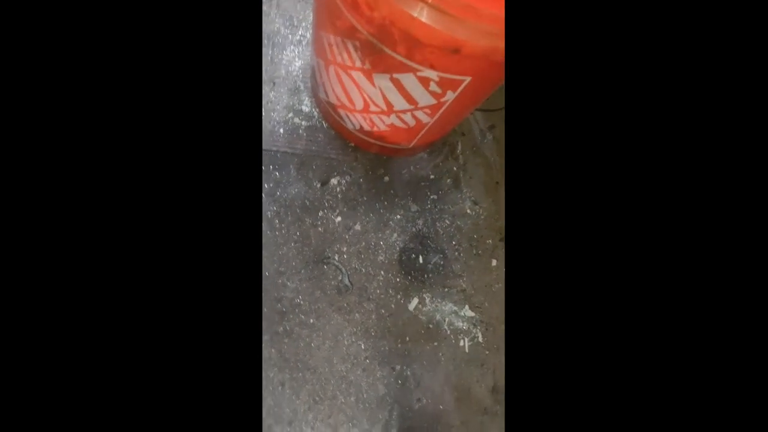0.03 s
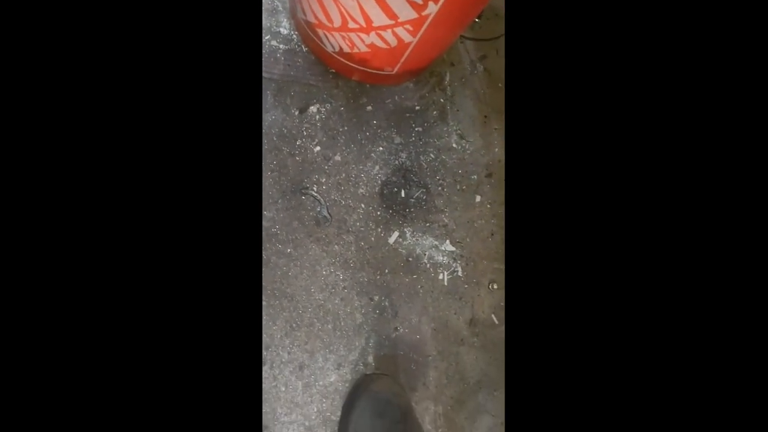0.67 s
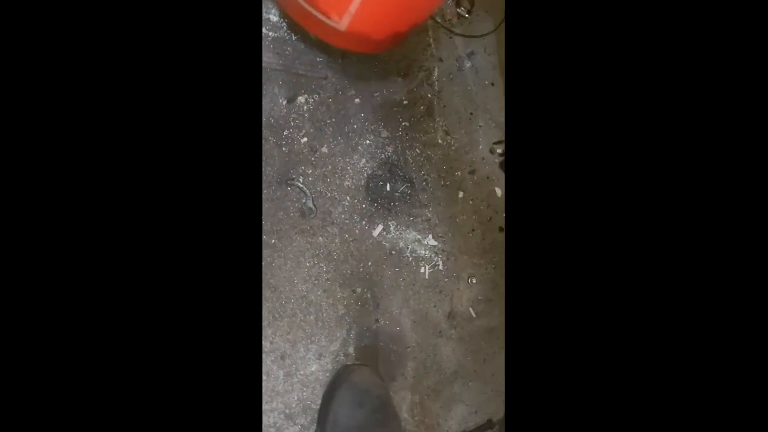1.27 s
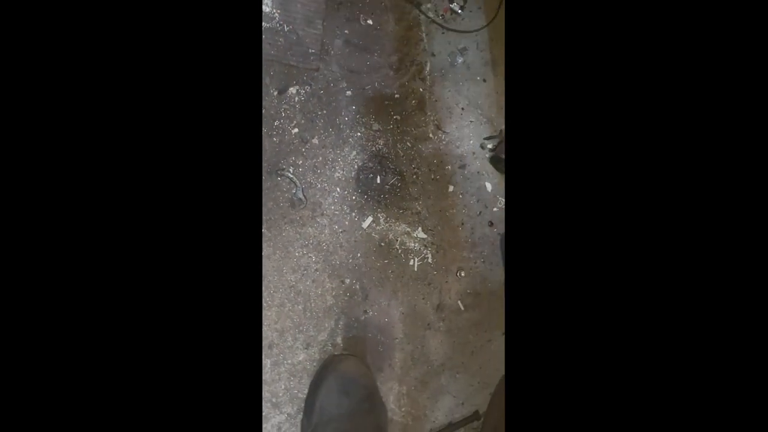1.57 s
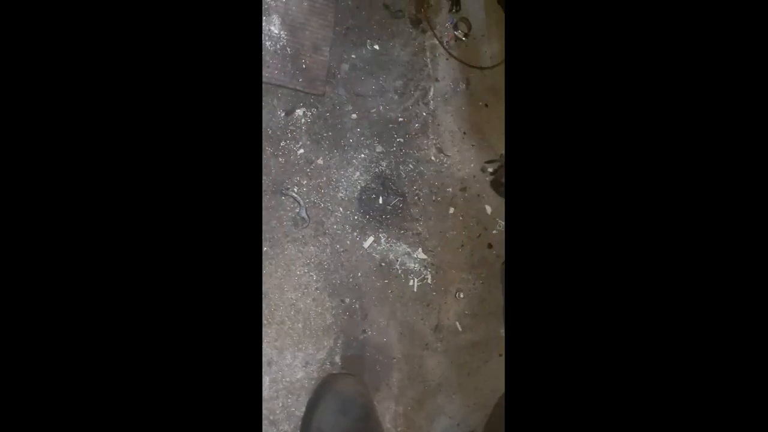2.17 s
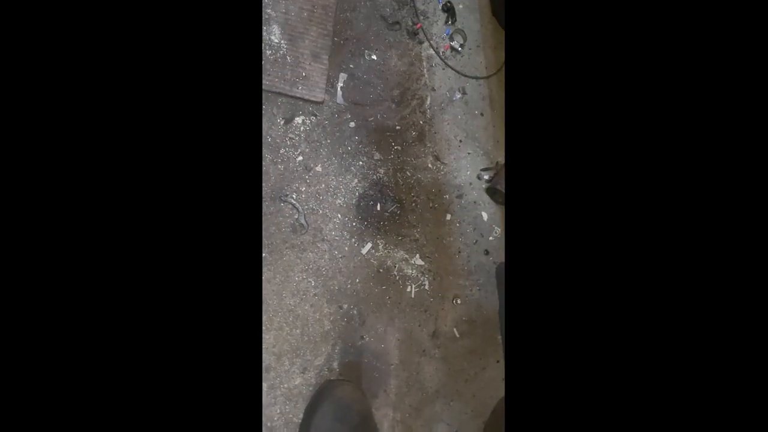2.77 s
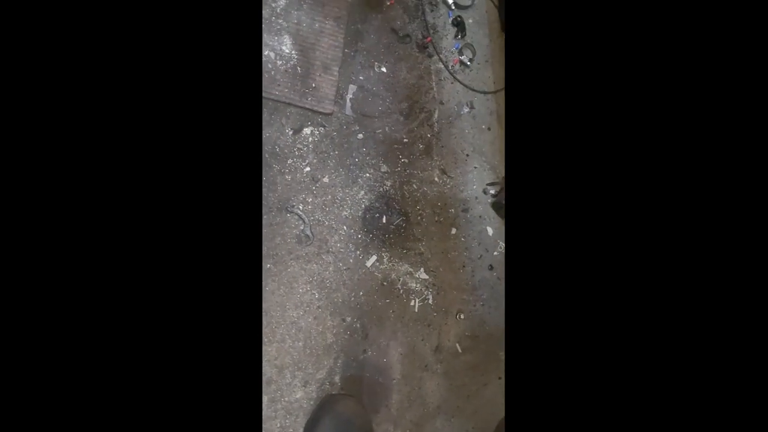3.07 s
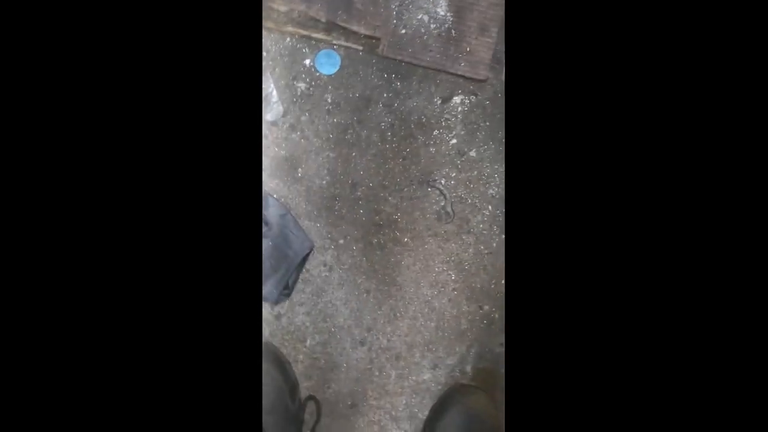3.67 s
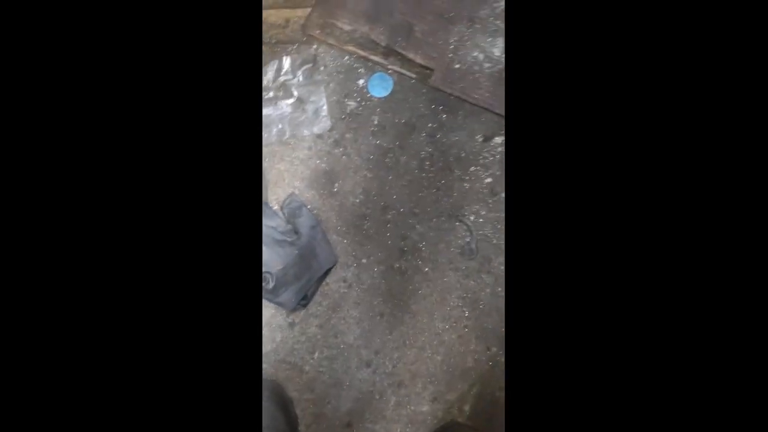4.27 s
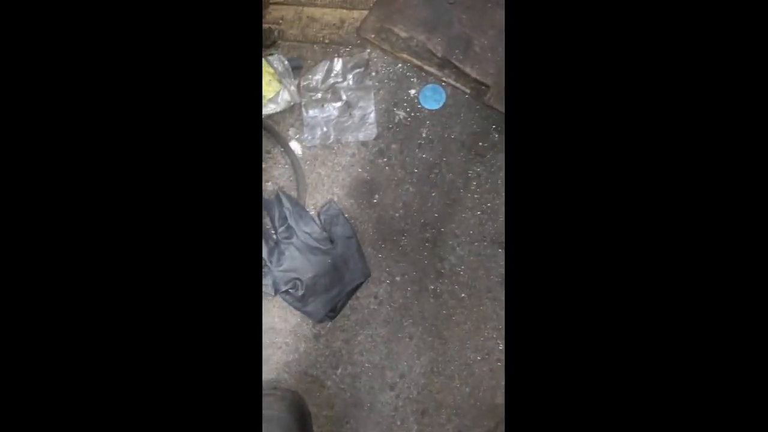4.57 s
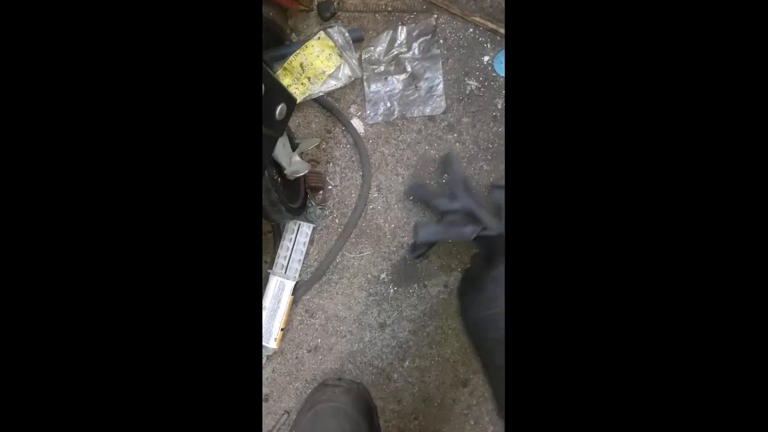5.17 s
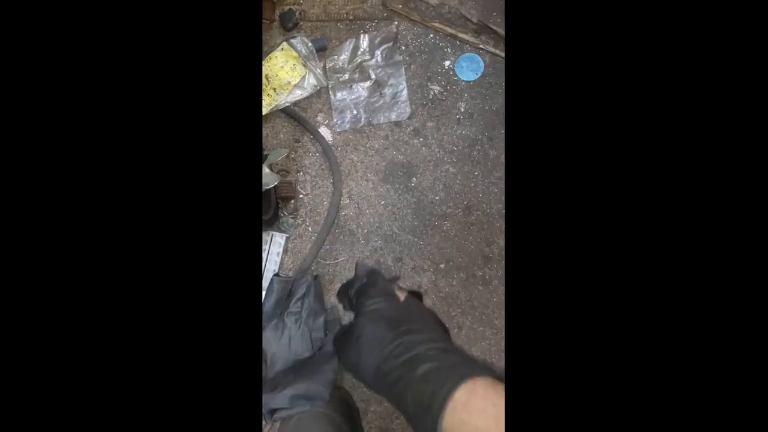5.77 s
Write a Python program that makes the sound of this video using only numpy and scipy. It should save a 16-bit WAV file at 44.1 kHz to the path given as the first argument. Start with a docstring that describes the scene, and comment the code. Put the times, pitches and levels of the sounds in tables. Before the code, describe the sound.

A plastic bucket knocks down, a glove rubs and squeaks against the microphone, then a shoe scuffs concrete and a rag is dragged.

```python
"""A workshop with a concrete floor. A hollow plastic bucket knocks down. A work glove shifts its grip on
a camera, right at the microphones: fabric sticks and slips, catches and squeaks, and fingers bump the
case. A shoe scuffs twice over grit, a heel taps, a gloved hand drags a rag out of the debris, and a
sleeve rustles over the faint hum of a distant motor."""
import sys
import numpy as np
from scipy import signal
from scipy.fft import rfft, irfft, next_fast_len
from scipy.io import wavfile

SR = 44100
rng = np.random.default_rng(int(sys.argv[2]) if len(sys.argv) > 2 else 0)


def bounce(signal):
    """Save signal as a 16-bit WAV file at the path given by the first command-line argument."""
    frames = np.transpose(np.atleast_2d(signal))
    limited = np.clip(frames, -1, 1)
    pcm = np.round(limited * 32767).astype(np.int16)
    wavfile.write(sys.argv[1], SR, pcm)


N = 265658
TIME_S = np.arange(N) / SR
FFT_SIZE = 2 * next_fast_len(N // 2 + SR // 2)
FREQ_HZ = np.maximum(np.arange(FFT_SIZE // 2 + 1) * SR / FFT_SIZE, 1)

# Source spectra. Each row: frequency in Hz, relative level in dB.
AIR_SPECTRUM = [(18, -42.5), (30, -11), (42, -15.5), (64, 0.5), (95, -14.5), (131, -4), (161, -6.5),
                (311, -10), (584, -15.5), (1280, -29), (2980, -28.5), (6380, -30.5), (16000, -27.5)]
SLEEVE_SPECTRUM = [(410, -14), (700, -5.5), (1120, -10), (1330, -4.5), (1460, -6), (3410, -2), (5190, -8),
                   (8100, -10), (10300, -17), (12300, -12.5), (16000, -18.5)]
RAG_SPECTRUM = [(500, -24), (900, -18.5), (1400, -7.5), (2000, -3.5), (3000, -5.5), (3800, -4),
                (5000, -12.5), (7000, -19.5)]
SOLE_SPECTRUM = [(80, -19), (210, -1), (430, -4), (700, -2), (870, -7.5), (1000, -3), (1500, -4.5),
                 (1850, -0.5), (2400, -3), (3100, -2), (3600, -0.5), (4400, -1), (5400, -3.5),
                 (7000, -15.5)]
GRIT_SPECTRUM = [(2500, -19.5), (5000, -6.5), (8000, 1.5), (10500, -4), (12500, -1), (16000, -9.5)]
BUCKET_SPECTRUM = [(29, -44.5), (50, -16), (193, -4), (249, -26), (306, 1.5), (376, -15.5), (715, -10.5),
                   (802, -14), (941, -14.5), (1630, -17), (1790, -24.5), (1960, -19.5), (2640, -27.5),
                   (12000, -59.5), (15600, -90), (22000, -120)]
WASH_SPECTRUM = [(29, -44.5), (50, -15.5), (133, -3.5), (380, -10.5), (428, -6.5), (1140, -18),
                 (1480, -13.5), (1790, -22), (2220, -17), (4230, -23.5), (5380, -19.5), (15000, -40.5)]
RUB_SPECTRUM = [(300, -10.5), (400, -10.5), (540, -4), (680, -1), (790, -7.5), (1000, -1.5), (1270, -1.5),
                (1420, -1), (1600, 0.5), (2000, -2.5), (3500, -4.5), (4500, -19)]
FIZZ_SPECTRUM = [(2500, -9.5), (4000, 2.5), (4700, -2.5), (5700, 1.5), (7100, 1), (8200, -2), (9500, -1),
                 (10500, -4), (12500, 0.5), (16000, -11.5)]
# Resonances of sole, case and microphone port air. Each row: frequency in Hz, width in Hz, gain in dB.
SOLE_MODES = [(974, 33, -4), (1504, 45, -3.5), (1880, 74, -2.5), (3050, 160, -2)]
CASE_MODES = [(201, 83, 2), (204, 88.4, 1.5)]
PORT_MODES = [(2495, 645, 1.5), (3130, 560, 2)]
# Likeness of the two microphones. Each row: frequency in Hz, left-right correlation.
MIC_CORRELATION = [(200, 0.96), (600, 0.32), (1000, -.25), (2500, 0), (4500, -0.059), (6000, 0.00017),
                   (7300, .8), (15000, 0.78)]
# Stereo balance by source position. Each row: frequency in Hz, left minus right in dB.
FLOOR_BALANCE = [(60, -6), (130, 0.5), (290, -2.5), (640, -1.5), (1410, 0), (3100, -7), (6820, -1),
                 (15000, -12)]
CASE_BALANCE = [(60, 0), (120, -11), (240, -0.5), (480, -2), (950, 5.5), (1890, 0.5), (3770, -4), (7520, 0),
                (15000, -8)]

# Distant motor. Each row: time in seconds, level in dB.
HUM_LEVELS = [(0, -78), (3.4, -84), (4.3, -73), (4.7, -67.5), (6.02, -71)]
# Clothes move with the arm. Each row: start and length in seconds, level in dB.
ARM_MOVES = [(.8, 0.2, -49), (.955, 0.089, -42), (2.96, 0.29, -64), (3.65, 0.54, -56), (4.11, 0.14, -50.5),
             (4.45, 0.46, -60.5), (5.16, 0.53, -58.5), (5.69, 0.3, -56.5)]
# Rag dragged over the floor. Each row: start and length in seconds, cloth and dust levels in dB.
RAG_DRAGS = [(4.683, 0.071, -43.5, -46.5), (4.832, 0.038, -46, -38), (4.862, 0.051, -42.5, -43.5),
             (4.912, 0.18, -39, -34), (5.095, 0.026, -39.5, -50), (5.47, 0.059, -48, -50.5)]
# Rag crumpled in the glove. Each row: start and length in seconds, level in dB.
RAG_SQUEEZES = [(5.21, 0.13, -61), (5.315, 0.1, -51), (5.46, 0.039, -42.5)]
# Grit ticks and a heel taps. Each row: time in seconds, relative level in dB, pitch in Hz, knock in dB.
FLOOR_TAPS = [(0.5663, -33, 2340, -49.5), (0.621, -29, 2330, -46.5), (2.9509, -15.5, 3350, -67),
              (3.458, -41, 2330, -52), (3.6852, -32.5, 2330, -46), (3.8225, -24, 3460, -38.5),
              (3.8562, -14, 1830, -26), (4.404, -20.5, 1900, -55), (4.8557, -23, 4000, -73),
              (5.382, -35, 2180, -85), (5.455, -35, 3080, -77), (5.6462, -30, 2480, -74)]
# Shoe on concrete. Each row: start and length in seconds, sole, grit and ring levels in dB.
SHOE_SCUFFS = [(3.775, 0.0497, -45, -62, -60), (3.812, .1, -27.5, -39.5, -42), (4.18, 0.12, -61, -76, -55),
               (4.268, 0.16, -43, -40.5, -42.5)]
# Fingers hit the case. Each row: time in seconds, relative level in dB, pitch in Hz, T60 in seconds.
FINGER_BUMPS = [(0.847, -36, 200, 0.097), (0.957, -42, 120, 0.071), (1.537, -12, 207, 0.085),
                (1.579, -17, 209, 0.091), (1.704, -2, 137, 0.018), (1.777, -26, 212, 0.071),
                (2.177, -23.5, 188.5, 0.099), (2.546, -5.5, 198, 0.037)]
# Glove squeaks. Each row: centre and half length in seconds, pitch in Hz, relative level in dB.
GLOVE_SQUEAKS = [(1.256, 0.028, 2720, -38), (1.424, .03, 1265, -27), (1.439, .03, 2730, -28),
                 (1.585, .025, 7270, -39), (1.62, .012, 9500, -28.5), (1.781, .012, 9450, -26.5)]
# Glove lets go. Each row: time in seconds, relative crack and ring levels in dB, left minus right in dB.
GLOVE_CATCHES = [(0.8473, -31, -48, 6), (0.979, -28, -39.5, -8), (1.0012, -25.5, -41, -6.5),
                 (1.171, -30, -32, -6), (1.1879, -22, -25, -5), (1.241, -23.5, -22.5, -4.5),
                 (1.265, -19, -17.5, -4.5), (1.33, -30.5, -21.5, 0), (1.3878, -12, -33.5, -2),
                 (1.4132, -5.5, -18, -1.5), (1.498, -5, -17.5, -6), (1.5546, -4, -11, 4),
                 (1.6157, -9, -8, -7), (1.623, -5, -23, 3), (1.6563, -6, -24.5, -1),
                 (1.705, -3.5, -14.5, -3), (1.7768, -8.5, -15, 4.5), (2.0512, -31, -68, 0),
                 (2.1522, -29, -50.5, 5), (2.2194, -28, -39, 1), (2.2715, -20.5, -38.5, -3),
                 (2.3283, -15.5, -36.5, 1.5), (2.3409, -23, -33, 0), (2.3993, -12.5, -42.5, -5.5),
                 (2.4512, -7.5, -27.5, -1), (2.539, -11, -19, -0.5), (2.5618, -11.5, -17, -2.5),
                 (2.5805, -15.5, -14.5, 1), (2.6113, -7.5, -10, -16)]
# Glove slides on the case. Each row: start and length in seconds, rub, fizz and boom levels in dB.
GLOVE_SLIDES = [(1.14, 0.075, -42, -51.5, -48), (1.238, 0.18, -34.5, -44, -44.5),
                (1.372, 0.29, -25.5, -24, -31.5), (1.64, .06, -34, -23.5, -26.5),
                (1.698, 0.093, -21, -25, -28), (1.83, 0.18, -46.5, -48.5, -54),
                (2.04, 0.13, -65, -61.5, -65), (2.145, 0.097, -46, -45.5, -41.5),
                (2.263, 0.067, -36.5, -32, -36), (2.312, .21, -34.5, -34.5, -33.5),
                (2.526, 0.094, -22, -32.5, -29.5), (2.65, .26, -54.5, -46, -60.5)]
# Glove crosses the ports. Each row: start and length in seconds, rasp level in dB.
PORT_PASSES = [(1.254, 0.0057, -25.5), (1.545, 0.051, -18.5), (1.712, 0.04, -17), (2.535, 0.065, -26.5)]


def amp(db):
    """Decibels to gain."""
    return 10 ** (np.asarray(db) / 20)


def pan(balance_db):
    """Left and right gains for a level difference."""
    return amp(balance_db * [[.5], [-.5]])


def at_hz(points):
    """A (Hz, value) table interpolated at every FFT bin."""
    hz, value = np.transpose(points)
    return np.interp(np.log(FREQ_HZ), np.log(hz), value)


def shape(points):
    """Minimum-phase response from (Hz, dB) points, falling away past both ends."""
    skirts = np.minimum(FREQ_HZ / points[0][0], 1) * np.minimum(points[-1][0] / FREQ_HZ, 1)
    cepstrum = irfft(np.log(amp(at_hz(points)) * skirts ** 2 + 1e-5))
    cepstrum[1:FFT_SIZE // 2] *= 2
    cepstrum[FFT_SIZE // 2 + 1:] = 0
    return np.exp(rfft(cepstrum))


def resonances(modes):
    """Response of parallel resonances with alternating signs."""
    return sum((-1) ** k * amp(db) / (1 + 1j * (FREQ_HZ ** 2 - hz ** 2) / (FREQ_HZ * width_hz))
               for k, (hz, width_hz, db) in enumerate(modes))


def drift(rate_hz):
    """Slow noise, standard deviation 1."""
    slow = irfft(rfft(rng.standard_normal(FFT_SIZE)) / (1 + (FREQ_HZ / rate_hz) ** 2))[:N]
    return slow / slow.std()


def grains(per_s, spread_db, life_s):
    """Envelope of tiny, uneven, fast-dying slips; rms 1."""
    onsets = rng.random(N) < per_s / SR
    sizes = amp(spread_db * np.minimum(rng.exponential(1, N), 4))
    energy = signal.lfilter([1], [1, -np.exp(-1 / (life_s * SR))], onsets * sizes ** 2 + 1e-18)
    return np.sqrt(energy / energy.mean())


def bursts(times_s, levels_db, t60_s):
    """Envelope of sudden blows that die away."""
    energy = np.zeros(N)
    energy[np.round(np.asarray(times_s) * SR).astype(int)] = amp(levels_db) ** 2
    return np.sqrt(signal.lfilter([1], [1, -amp(-120 / (t60_s * SR))], energy + 1e-18))


def strokes(rows, attack_s, slope_db_per_s, release_db_per_s):
    """One envelope per level column: attack, sloping hold, release."""
    gains = 0
    for start_s, length_s, *levels_db in rows:
        age_s = np.maximum(TIME_S - start_s, 0)
        hold_db = slope_db_per_s * (np.minimum(age_s, length_s) - length_s / 2)
        release_db = release_db_per_s * np.maximum(age_s - length_s, 0)
        swell = np.minimum(age_s / attack_s, 1) ** 2 * amp(np.maximum(hold_db - release_db, -120))
        gains = np.maximum(gains, amp(levels_db)[:, None] * swell)
    return gains


def excite(envelope, response, balance=None):
    """A random force drives a response of unit power gain, heard at two microphones."""
    mid, side = rfft(envelope * rng.standard_normal((2, N)), FFT_SIZE)
    correlation = np.clip(at_hz(MIC_CORRELATION), -.9, .99)
    pair = mid + side * np.sqrt((1 - correlation) / (1 + correlation)) * [[1], [-1]]
    if balance is not None:
        pair = pair * pan(at_hz(balance))
    return irfft(pair * response / np.sqrt(np.mean(np.abs(response) ** 2)))[:, :N]


def room_tail(sound, t60_s, cutoff_hz):
    """Short, dull reverberation of a cluttered room, different on each side."""
    age_s = TIME_S[:SR // 2]
    tail = rng.standard_normal((2, len(age_s))) * amp(-60 * age_s / t60_s) * (age_s > .005)
    tail = signal.lfilter(*signal.butter(1, cutoff_hz, fs=SR), tail)
    return signal.fftconvolve(sound, tail / np.sqrt(np.sum(tail ** 2) / 2), axes=1)[:, :N]


def air_and_motor():
    """Still air and a slightly wavering motor hum."""
    pitch_hz = 576 + 2.7 * drift(rate_hz=17)
    hum_db = np.interp(TIME_S, *np.transpose(HUM_LEVELS))
    hum = amp(hum_db) * np.sqrt(2) * np.sin(2 * np.pi * np.cumsum(pitch_hz) / SR)
    return excite(amp(-63), shape(AIR_SPECTRUM)) + hum


def sleeve():
    """Folds of clothing brush each other."""
    motion = strokes(ARM_MOVES, attack_s=.031, slope_db_per_s=-1.5, release_db_per_s=138.5)
    rustle = grains(per_s=1200, spread_db=-3.5, life_s=.0028)
    return excite(motion * rustle, shape(SLEEVE_SPECTRUM), FLOOR_BALANCE)


def rag():
    """Cloth sweeps over hissing dust, then crumples in the glove and sheds some."""
    sweep, dust = strokes(RAG_DRAGS, attack_s=.021, slope_db_per_s=31, release_db_per_s=444)
    squeeze = strokes(RAG_SQUEEZES, attack_s=.042, slope_db_per_s=50.5, release_db_per_s=106)
    weave = grains(per_s=3500, spread_db=2.5, life_s=.0012)
    cloth = excite(sweep * weave, shape(RAG_SPECTRUM), FLOOR_BALANCE)
    fold_response = shape([(1300, -30), (1900, -1.5), (3300, -4), (5000, -15.5)])
    folds = excite(squeeze * weave, fold_response, FLOOR_BALANCE)
    hiss = excite((dust + amp(-4) * squeeze) * weave, shape(GRIT_SPECTRUM), FLOOR_BALANCE)
    return cloth + folds + hiss


def floor_taps():
    """Grit ticks and a heel taps on the floor: a snap, a brief ring, a dull knock."""
    taps = np.zeros((2, N))
    age_s = TIME_S[:SR // 8]
    snap_envelope = np.exp(-age_s / .00035) + amp(-.5) * np.exp(-age_s / .013)
    for time_s, db, hz, _ in FLOOR_TAPS:
        noise = rng.standard_normal((2, len(age_s))) * snap_envelope
        snap = signal.lfilter(*signal.iirpeak(hz, Q=1.6, fs=SR), noise)
        ring = np.exp(-np.minimum(age_s * hz / 5, 20)) * np.sin(2 * np.pi * hz * age_s)
        start = round(time_s * SR)
        taps[:, start:start + len(age_s)] += amp(db - 4) * (snap + ring)
    times_s, _, _, knock_db = np.transpose(FLOOR_TAPS)
    floor_response = shape([(400, -16), (650, 3), (1300, -11.5)])
    return taps + excite(bursts(times_s, knock_db, t60_s=.071), floor_response)


def shoe():
    """The sole drags harder as weight comes on, rolls grit and rings a little."""
    sole, grit, ring = strokes(SHOE_SCUFFS, attack_s=.044, slope_db_per_s=89, release_db_per_s=594)
    crunch = grains(per_s=2500, spread_db=-.5, life_s=.0022)
    return (excite(sole * crunch, shape(SOLE_SPECTRUM), FLOOR_BALANCE)
            + excite(grit * crunch, shape(GRIT_SPECTRUM), FLOOR_BALANCE)
            + excite(ring * crunch, resonances(SOLE_MODES), FLOOR_BALANCE))


def bucket(knock_db=-12, t60_s=.11, wash_db=-52, wash_s=.78):
    """A hollow plastic knock, then a soft wash that sinks away."""
    knock = excite(amp(knock_db - 60 * np.minimum(TIME_S / t60_s, 2)), shape(BUCKET_SPECTRUM))
    wash = strokes([(.0058, wash_s, wash_db)], attack_s=.005, slope_db_per_s=-7, release_db_per_s=29)
    return knock + excite(wash, shape(WASH_SPECTRUM))


def finger_bumps():
    """A soft fingertip swings the case for a few cycles, with a dull pat."""
    swing = np.zeros(N)
    for time_s, db, hz, t60_s in FINGER_BUMPS:
        age_s = np.clip(TIME_S - time_s, 0, 1)
        onset = 1 - np.exp(-(age_s / .0045) ** 2)
        swing += amp(db + 9 - 60 * age_s / t60_s) * onset * np.sin(2 * np.pi * hz * age_s)
    times_s, levels_db, _, _ = np.transpose(FINGER_BUMPS)
    pat_response = shape([(60, -20.5), (200, 10.5), (400, -7.5), (650, 1.5), (1000, -25)])
    return swing + excite(bursts(times_s, levels_db - 5.5, t60_s=.048), pat_response)


def glove_squeaks():
    """Stick-slip locks to one resonance: a rough tone swells and fades."""
    squeaks = np.zeros(N)
    for centre_s, half_s, hz, db in GLOVE_SQUEAKS:
        swell = np.exp(-np.minimum(((TIME_S - centre_s) / half_s) ** 4, 20))
        flutter = drift(rate_hz=30 + hz / 50)
        squeaks += amp(db + 7.5) * swell * flutter * np.sin(2 * np.pi * hz * TIME_S)
    return squeaks


def glove_chirps(count=16, low_hz=949, high_hz=9800):
    """Slips lock at random to one pitch or another for milliseconds; rms about 1."""
    pitches_hz = np.geomspace(low_hz, high_hz, count) * rng.uniform(.96, 1.04, count)
    tones = sum(grains(per_s=8, spread_db=1, life_s=.008) * np.sin(2 * np.pi * hz * TIME_S)
                for hz in pitches_hz)
    return tones * drift(rate_hz=72) * np.sqrt(2 / count)


def glove_catches():
    """Caught fabric lets go with a bright crack; ports and shell ring."""
    times_s, crack_db, ring_db, balance_db = np.transpose(GLOVE_CATCHES)
    snap = bursts(times_s, crack_db - 10.5, t60_s=.0084)
    tail = bursts(times_s, crack_db - 12, t60_s=.067)
    crack = excite(snap + tail, shape(FIZZ_SPECTRUM), CASE_BALANCE)
    ports = excite(bursts(times_s, ring_db, t60_s=.051), resonances(PORT_MODES))
    shell = excite(bursts(times_s, ring_db - 10, t60_s=.036), shape(RUB_SPECTRUM))
    latest_catch = np.maximum(np.searchsorted(times_s, TIME_S + .002) - 1, 0)
    return crack + (ports + shell) * pan(balance_db[latest_catch])


def glove_rub(full_stick_db=-35):
    """Fabric sticks and slips, rougher under a firm press; the same slips drive shell and ports."""
    press, brush, sway = strokes(GLOVE_SLIDES, attack_s=.021, slope_db_per_s=-8.5, release_db_per_s=400.5)
    over_ports = strokes(PORT_PASSES, attack_s=.024, slope_db_per_s=13.5, release_db_per_s=449)
    stick = np.clip(press / amp(full_stick_db), .4, 1)   # a light touch glides
    slips = (grains(per_s=500, spread_db=1, life_s=.0056) * amp(2.5 * drift(rate_hz=44))) ** stick
    rub = excite(press * slips, shape(RUB_SPECTRUM), CASE_BALANCE)
    rasp = excite((amp(-8.5) * press + over_ports) * slips, resonances(PORT_MODES), CASE_BALANCE)
    fibres = grains(per_s=6000, spread_db=2.5, life_s=.0008) ** stick
    snags = amp(-10) * grains(per_s=90, spread_db=5, life_s=.007) ** stick
    fizz = excite(brush * np.hypot(slips * fibres, snags), shape(FIZZ_SPECTRUM), CASE_BALANCE)
    boom = excite(sway, resonances(CASE_MODES))
    chirps = amp(-4.5) * press * stick * glove_chirps()
    return rub + rasp + fizz + boom + chirps


def scene():
    """Sounds on the case and farther off, both nearly dry, over air and hum."""
    near = glove_rub() + glove_catches() + finger_bumps() + glove_squeaks()
    far = floor_taps() + shoe() + rag() + sleeve() + bucket()
    room = room_tail(amp(-22.5) * near + amp(-26.5) * far, t60_s=.3, cutoff_hz=5060)
    return near + far + room + air_and_motor()


def record(dry):
    """Microphones: bass cut, soft clipping, treble cut."""
    low_cut_hz, high_cut_hz = 42, 16200
    heard = signal.sosfilt(signal.butter(2, low_cut_hz, "high", fs=SR, output="sos"), dry)
    rounded = 1.027 * np.tanh(heard / 1.177)
    return signal.sosfilt(signal.ellip(10, .1, 70, high_cut_hz, fs=SR, output="sos"), rounded)


dry = scene()
out = record(dry)
bounce(out)
```